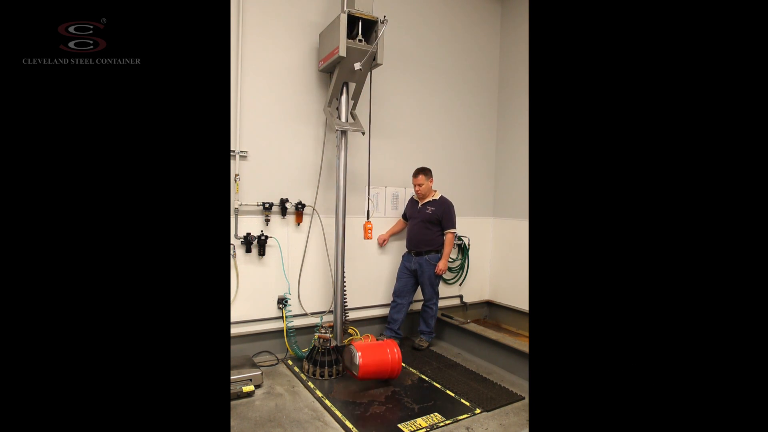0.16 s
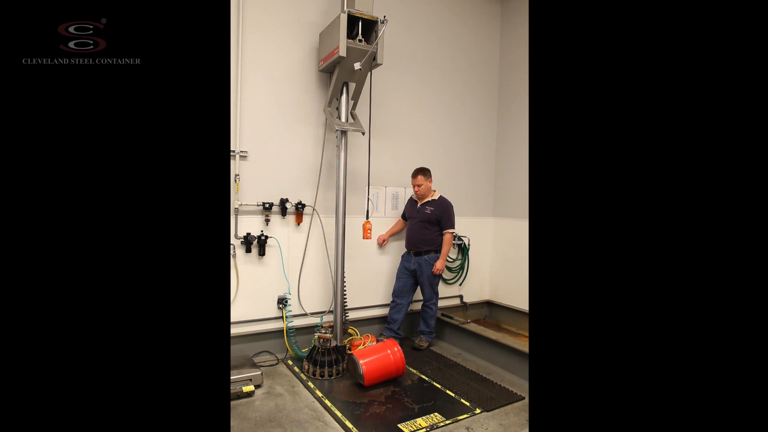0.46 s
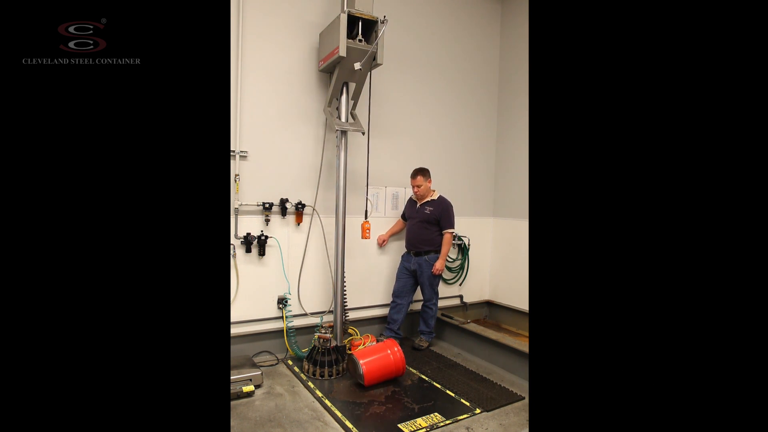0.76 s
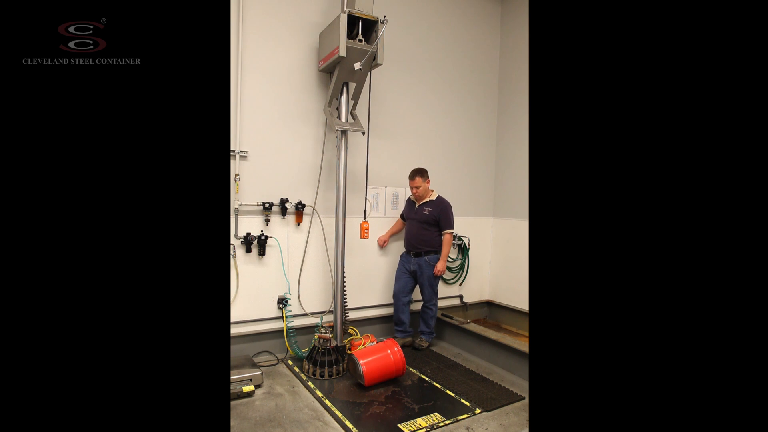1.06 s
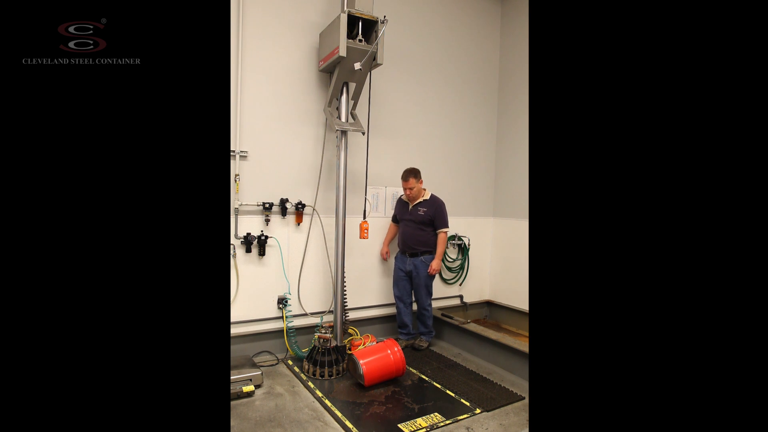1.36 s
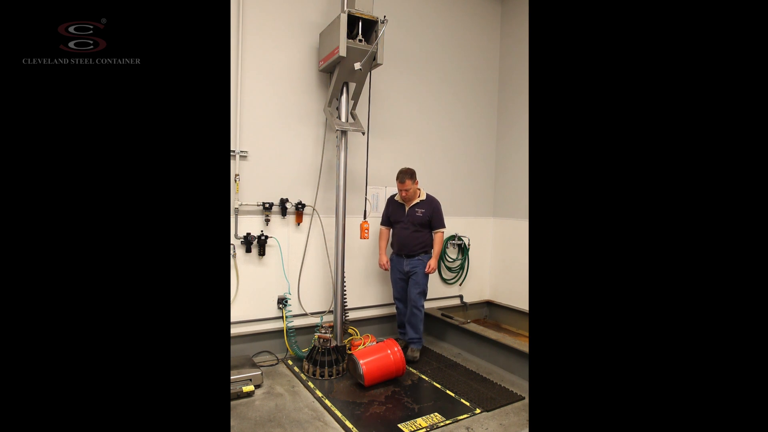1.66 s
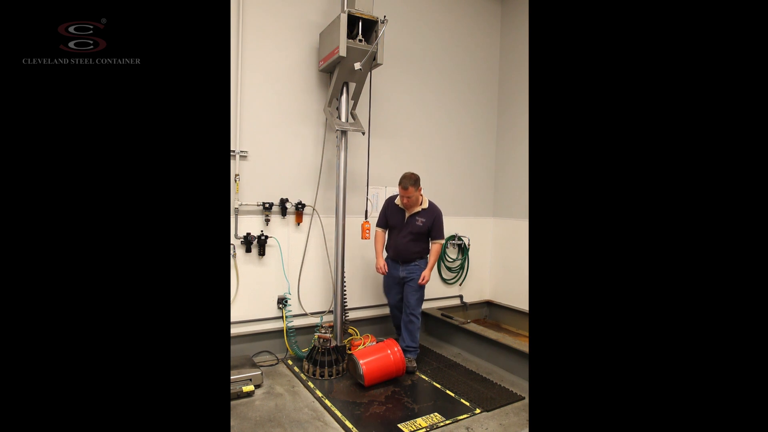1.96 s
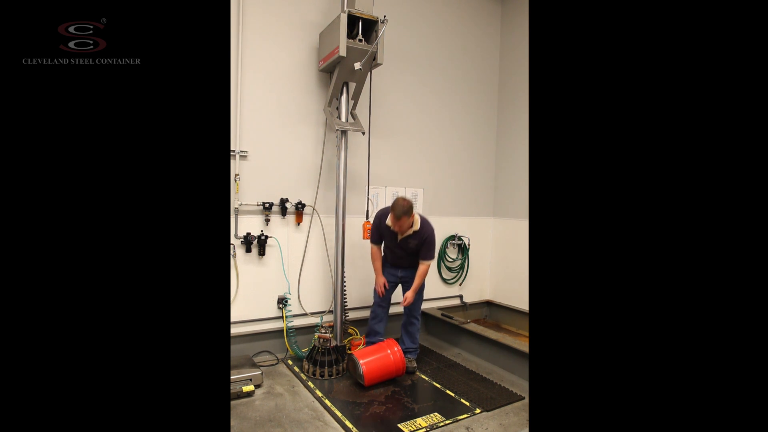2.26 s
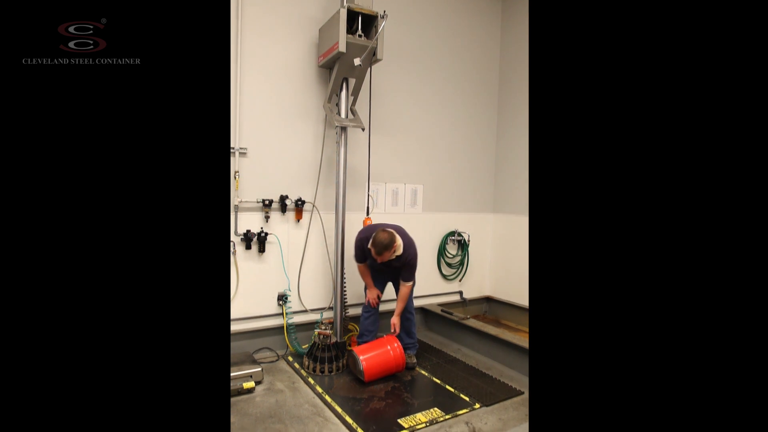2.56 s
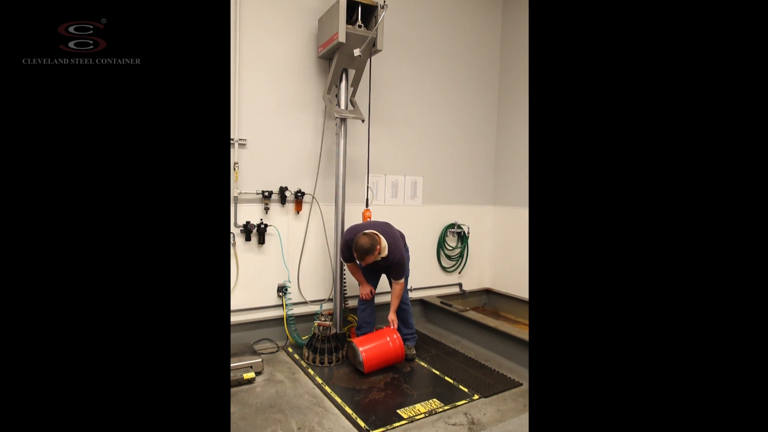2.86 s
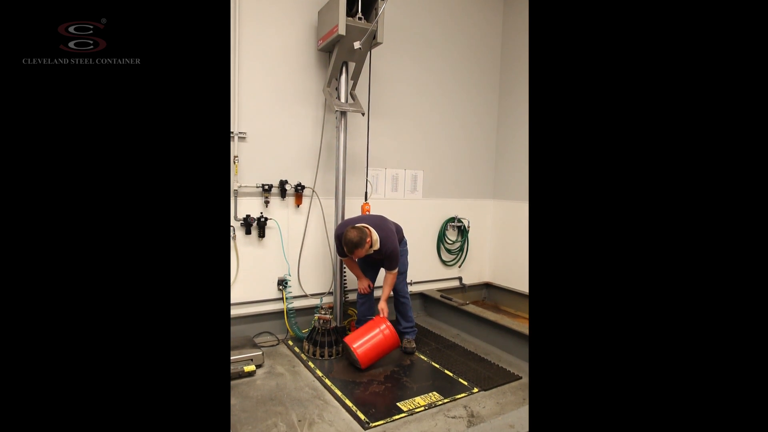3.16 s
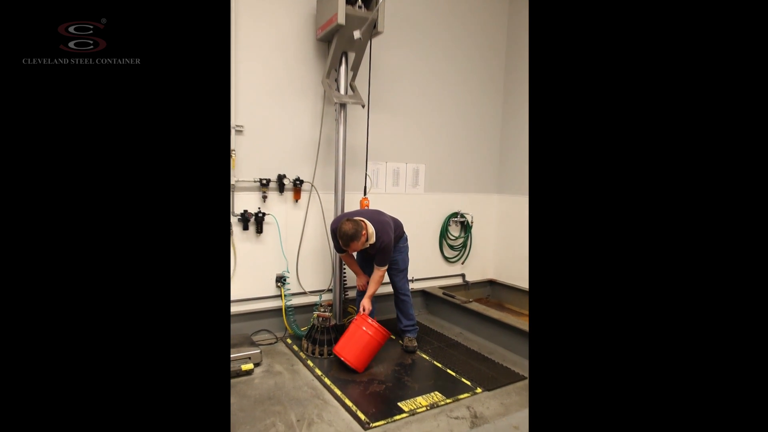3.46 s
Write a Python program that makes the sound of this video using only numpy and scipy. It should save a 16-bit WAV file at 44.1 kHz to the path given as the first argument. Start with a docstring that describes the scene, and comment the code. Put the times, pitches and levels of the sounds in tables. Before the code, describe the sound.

A steel pail slams onto a steel floor plate at 0.15 seconds, just after a drop rig's clatter, with weaker rebounds until 0.5. Boom and bright echo fade through a hard workshop; a thin handle ping follows near 1.04. The level dips over wavering ventilation hum, with ticks and soft swishes from 1.6. From 3.0 the pail scrapes and rumbles, thuds softly, and its handle knocks at 3.4.

```python
"""A clattering drop rig is heard first; its steel pail then slams onto a steel floor plate in a hard-walled workshop.
Modes, filtered noise and a diffuse echo form each rebound; the wire handle pings as decaying sines and noise.
Small ticks and swishes of noise sound over a wavering ventilation hum while the level dips.
The pail is then dragged and tipped up, as random contacts; soft rim thuds excite its modes,
and knocks against its wall ring those of the handle."""
import sys
import numpy as np
from scipy import signal
from scipy.fft import rfft, irfft
from scipy.io import wavfile

SR = 44100
rng = np.random.default_rng(int(sys.argv[2]) if len(sys.argv) > 2 else 0)


def generate_wav(sig):
    """Save sig (samples, or channels by samples) to the path in sys.argv[1] as 16-bit PCM at SR."""
    pcm = np.round(np.clip(np.atleast_2d(sig).T, -1, 1) * 32767).astype(np.int16)
    wavfile.write(sys.argv[1], SR, pcm)


N = 158760

# Source levels are those before the overall level curve and the stereo balance.
# Blows of the pail on the plate. Each row: start in seconds, level of body, boom and echo in dB, crack in dB.
SLAMS = [(0.1476, -18.5, -6), (.226, -28.5, -24), (.349, -39, -22.5), (.408, -45.5, -23),
         (.472, -44, -27.5)]
# Modes of the pail. Each row: frequency in Hz, relative level in dB, decay time t60 in seconds.
PAIL_MODES = [(150, 1, .55), (178, -2, .55), (291, -4, .8), (346, -4, .8), (470, -6, .7), (576, -1, .65),
              (738, -2, .9), (765, -3, .7), (1076, -7, .8), (1150, -6, .7), (1295, -11, .9),
              (2283, -10, .4), (3125, -9, .3), (7208, -10, .45), (7620, -10, .4)]
# Spectrum of the slam's crack. Each row: frequency in Hz, density in dB per Hz.
CRACK_COLOUR = [(100, -22), (500, -4), (1200, 2.5), (2300, -8.5), (4300, -14.5), (6000, -4), (7300, 2),
                (9000, -10), (11000, -20.5), (14500, -24), (17000, -42.5)]
# Spectrum of the slam's echo. Each row: frequency in Hz, density in dB per Hz.
SLAM_COLOUR = [(40, -33), (100, -17), (150, -7), (300, -5), (500, -4.5), (700, -1), (950, -5.5), (1300, -6),
               (1800, -7.5), (2600, -10), (4200, -9.5), (7300, -8), (9000, -15.5), (11000, -25.5),
               (14000, -35), (16500, -49)]
# Spectrum of the pail's boom. Each row: frequency in Hz, density in dB per Hz.
BOOM_COLOUR = [(30, -32), (70, -16), (110, -10.5), (150, -2.5), (200, -2), (240, -7.5), (290, -2),
               (420, -10), (570, -4.5), (900, -19), (2500, -50.5)]
BOOM_DB, BOOM_BUILD_S, BOOM_T60_S = -7.5, 0.095, .48  # level relative to the slam

# Soft thuds of the rim as the pail rocks. Each row: start in seconds, level in dB.
THUDS = [(3.076, -38), (3.558, -34.5)]
THUD_SOFT_HZ, THUD_T60_S = 350, 0.32  # treble roll-off; extra decay on top of the modes' own

# Knocks of the handle on the pail. Each row: start in seconds, echo in dB, crack in dB, ring in dB.
KNOCKS = [(3.3924, -35.5, -28.5, -29), (3.402, -36, -24, -38.5), (3.413, -66, -29, -38.5),
          (3.452, -55, -30.5, -49)]
# Modes of the wire handle. Each row: frequency in Hz, relative level in dB, decay time t60 in seconds.
HANDLE_MODES = [(1294, -10, 1.2), (1614, -9, .8), (1790, -13, .7), (1916, -12, .8), (2214, -12, .8),
                (2344, -13, .7), (3117, 0, .55), (3167, -3, .5), (3270, -2, .08), (3413, -8, .3),
                (5276, -14, .3), (7144, -19, .4)]
# Spectrum of a knock and its echo. Each row: frequency in Hz, density in dB per Hz.
KNOCK_COLOUR = [(100, -41.5), (600, -11), (850, -3.5), (1150, 1.5), (1700, 0), (2500, -4), (3150, 1.5),
                (4200, -5.5), (7000, -10.5), (10000, -20.5), (15000, -45), (17000, -42)]

# Modes of the settling handle. Each row: frequency in Hz, relative level in dB, decay time t60 in seconds.
PING_MODES = [(7260, 0, 1.8), (7270, -8, 1.8), (7310, -7, 1.1), (7480, -9, .6), (7820, -13.5, .3)]
# Spectrum of the ping's shimmer. Each row: frequency in Hz, density in dB per Hz.
PING_SHIMMER_COLOUR = [(1000, -48.5), (6000, -41), (6950, -25), (7130, 10), (7400, 4), (7900, -5.5),
                       (8600, -16), (11000, -46), (16000, -52.5)]
# Spectrum of the ping's click. Each row: frequency in Hz, density in dB per Hz.
PING_CLICK_COLOUR = [(1000, -45), (6600, -28), (7200, -2), (7900, 5.5), (8800, -7), (10500, -20.5),
                     (16000, -42)]
PING_S, PING_DB, SHIMMER_T60_S = 1.04, -59.5, 2.2

# Effort of dragging the pail. Each row: time in seconds, grit level in dB.
DRAG = [(3.02, -38.5), (3.08, -36), (3.12, -61), (3.2, -57), (3.38, -47.5), (3.6, -30)]
# Rumble of the pail rolling on its rim. Each row: time in seconds, level in dB.
ROLL = [(2.98, -74.5), (3.03, -57), (3.08, -43.5), (3.14, -41.5), (3.25, -42.5), (3.38, -42.5), (3.44, -39),
        (3.52, -40.5), (3.6, -42)]
# Spectrum of the scraping grit. Each row: frequency in Hz, density in dB per Hz.
SCRAPE_COLOUR = [(180, -26), (300, 1.5), (519, -13.5), (856, -10), (1100, -12.5), (1360, -10.5),
                 (1510, -15), (2610, -16), (4830, -26.5), (6300, -26.5), (16000, -67.5)]
# Spectrum of the rolling rumble. Each row: frequency in Hz, density in dB per Hz.
RUMBLE_COLOUR = [(30, -29), (70, -17), (120, -5.5), (170, 4.5), (215, -5.5), (290, -5.5), (400, -13),
                 (600, -25), (1500, -59)]
DRAG_START_S = 3.015

# Spectrum of the rig's clatter. Each row: frequency in Hz, density in dB per Hz.
RIG_COLOUR = [(24, -56.5), (40, -23), (124, -19), (171, -0.5), (297, -11), (345, 2), (491, -8),
              (542, -11.5), (770, -8), (918, -14.5), (1270, -9.5), (1480, -14), (6330, -21), (7360, -16.5),
              (16000, -63.5)]
RIG_S, RIG_DB, RIG_CLATTER_S = -.2, -24, 0.27  # starts before time zero; contacts last RIG_CLATTER_S

# Small dry ticks. Each row: start in seconds, level in dB, treble tilt in dB per octave, hollow clack in dB.
TICKS = [(1.5983, -66, -13, -63), (1.627, -44.5, 0.5, -43), (1.631, -66, 1, -56),
         (1.8156, -58.5, -0.5, -64.5), (1.956, -54, 0, -55.5), (2.4978, -54, -4, -60), (2.517, -53, 0, -59),
         (2.5408, -53.5, 0, -59), (2.5642, -62, 5, -62), (2.576, -53.5, -3, -54.5), (2.597, -58, 1.5, -66),
         (2.6259, -49, 4, -60), (2.658, -49, 3.5, -59), (2.766, -47.5, 3, -52.5), (2.962, -39, 2, -49)]
# Spectrum of a tick before its tilt. Each row: frequency in Hz, density in dB per Hz.
TICK_COLOUR = [(50, -31.5), (200, -3), (700, -6.5), (1200, 7.5), (2100, -4), (3300, -1.5), (4300, -6.5),
               (5500, -1), (7000, 0.5), (9000, -14), (12500, -36), (14500, -37.5), (17000, -56)]
# Spectrum of the hollow clack. Each row: frequency in Hz, density in dB per Hz.
CLACK_COLOUR = [(100, -38), (700, -21), (1100, -10), (1700, 1.5), (2400, 3.5), (2900, -13), (3700, -13),
                (5000, -26), (16000, -52)]

# Soft swishes of clothes and shoe soles.
# Each row: centre in seconds, half width in seconds, level in dB, treble tilt in dB per octave.
SWISHES = [(1.645, 0.0224, -62.5, -7), (1.89, 0.062, -73.5, -4), (1.98, 0.036, -69.5, -7.5),
           (2.14, 0.0436, -72, 0), (2.32, 0.039, -73, 4), (2.49, 0.13, -69.5, -5), (2.59, 0.14, -65.5, -10),
           (2.8, 0.082, -69.5, -9)]
# Spectrum of a swish before its tilt. Each row: frequency in Hz, density in dB per Hz.
SWISH_COLOUR = [(100, -39), (700, -5.5), (1300, -5), (2500, -2.5), (4500, -5), (7000, 3), (10000, -11.5),
                (13000, -21.5), (17000, -33.5)]

# Ventilation hum. Each row: frequency in Hz, level before the swell in dB.
HUM = [(167, -52), (196, -65.5), (288, -63.5), (420, -66), (845, -76.5), (1270, -72.5), (2190, -79),
       (2310, -78.5)]
# Swelling and sinking of the hum. Each row: time in seconds, gain in dB.
HUM_SWELL = [(.75, -2.5), (.95, 6), (1.15, 3.5), (1.5, -1), (2.0, -3), (2.5, 0), (3.0, -1.5)]
# Spectrum of the rush of air. Each row: frequency in Hz, density in dB per Hz.
AIR_COLOUR = [(18, -61.5), (30, -31.5), (118, -11), (161, -5.5), (210, -12.5), (287, -10.5), (384, -18.5),
              (426, -12.5), (540, -29), (584, -19.5), (684, -32), (822, -27), (1350, -27), (2170, -27.5),
              (4300, -40.5), (6550, -39), (16000, -67.5)]
AIR_DB = -54

# Reverberation of the workshop. Each row: frequency in Hz, decay time t60 in seconds.
ROOM_T60 = [(60, 0.97), (150, 1.2), (300, 1.25), (700, 1.78), (1500, 1.55), (4000, 1.466), (7500, 1.214),
            (10000, 0.89), (16000, 1.1)]
BUILD_S, BASS_BUILD_S = 0.0014, 0.11  # build-up time constant; amount added in the bass

# Level of all but the ticks and swishes: it dips and slowly recovers. Each row: time in seconds, gain in dB.
LEVEL_DIP = [(1.135, -6.5), (1.21, -19.5), (1.33, -18.5), (1.55, -11.5), (1.8, -10), (2.2, -8),
             (2.55, -7.5), (2.95, -5.5), (3.05, 5)]
LEFT_DB = 7.65  # left relative to right
CEILING, TOP_HZ = .85, 16500  # largest amplitude entering the filter; its cutoff


def amp(db):
    """A level in decibels is twenty times the logarithm of the amplitude ratio."""
    return 10 ** (np.asarray(db) / 20)


def clock():
    """Sampled time is the sample index over the rate, in seconds."""
    return np.arange(N) / SR


def unit(x, span_s=None):
    """Normalisation to rms 1, over the opening span if one is given."""
    end = N if span_s is None else int(span_s * SR)
    return x / np.sqrt(np.mean(x[:end] ** 2))


def at_hz(points, hz):
    """Linear interpolation of a table on a logarithmic frequency axis."""
    f, v = np.array(points, float).T
    return np.interp(np.log(np.maximum(hz, 1)), np.log(f), v)


def gain_curve(points):
    """Time-varying gain, interpolated in decibels."""
    times, levels = np.array(points, float).T
    return amp(np.interp(clock(), times, levels))


def conv(x, h):
    """Linear convolution, cut to the scene's length."""
    return signal.fftconvolve(x, h)[:N]


def colour(x, points, tilt_db=0, size=4096):
    """Minimum-phase filtering to a spectrum, with a tilt per octave above 1 kHz."""
    f = np.maximum(np.fft.rfftfreq(size, 1 / SR), 1)
    octaves = np.log2(np.maximum(f / 1000, 1))
    cepstrum = irfft(np.log(amp(at_hz(points, f) + tilt_db * octaves)))
    # folding the cepstrum onto positive times makes the filter causal
    cepstrum[1:size // 2] *= 2
    cepstrum[size // 2 + 1:] = 0
    return conv(x, irfft(np.exp(rfft(cepstrum))))


def add(out, x, start_s):
    """Superposition of a sound at its start; any part before time zero is lost."""
    i = int(start_s * SR)
    x, i = x[max(-i, 0):], max(i, 0)
    out[i:i + len(x)] += x[:N - i]


def fade(t60):
    """Exponential decay, falling 60 dB in t60 seconds."""
    return np.exp(-np.log(1000) * clock() / max(abs(t60), 1e-3))


def walk(rate_hz):
    """Low-pass Gaussian noise: a smooth random wander of rms 1."""
    f = np.fft.rfftfreq(N, 1 / SR)
    spectrum = rfft(rng.standard_normal(N)) * np.exp(-(f / rate_hz) ** 2)
    return unit(irfft(spectrum, N))


def ring(modes, flutter):
    """Modal synthesis: decaying sines whose strength flutters as echoes overlap."""
    t, out = clock(), np.zeros(N)
    for hz, db, t60 in modes:
        strength = amp(db) * fade(t60) * (1 + flutter * walk(22))
        out += strength * np.sin(2 * np.pi * (hz * t + rng.random()))
    return out


def room():
    """Diffuse reverberation: noise bands build up and decay, the bass building up more slowly."""
    f, noise = np.fft.rfftfreq(N, 1 / SR), rfft(rng.standard_normal(N))
    out = np.zeros(N)
    centres = np.geomspace(50, 16000, 14)
    # each row of the identity matrix picks out one overlapping band
    for hz, pick in zip(centres, np.eye(len(centres))):
        band = irfft(noise * at_hz(np.c_[centres, pick], f), N)
        build_s = BUILD_S + BASS_BUILD_S / (1 + (hz / 450) ** 2)
        out += band * fade(at_hz(ROOM_T60, hz)) * (1 - np.exp(-clock() / build_s))
    return out


def chatter(rate, spread_db):
    """Random impulses at a mean rate per second, of random sign and log-normal size."""
    happens = rng.random(N) < rate / SR
    sign = rng.choice([-1, 1], N)
    return happens * sign * amp(spread_db * rng.standard_normal(N))


def crack(t60, shiver_db, shiver_t60):
    """Two-stage noise decay: a hard contact, then the brief shiver of dense sheet-metal modes."""
    return rng.standard_normal(N) * (fade(t60) + amp(shiver_db) * fade(shiver_t60))


def slams():
    """Impact excitation: each blow cracks, rings the pail, makes it boom and fills the room."""
    out, t = np.zeros(N), clock()
    for s, db, crack_db in SLAMS:
        contact = crack(t60=0.0085, shiver_db=-2.5, shiver_t60=0.17)
        hit = unit(colour(contact, CRACK_COLOUR), .003)
        body = unit(ring(PAIL_MODES, flutter=0.45) * (1 - np.exp(-t / .02)), .1)
        boom_envelope = fade(BOOM_T60_S) * (1 - np.exp(-t / BOOM_BUILD_S)) ** 2
        boom = unit(colour(rng.standard_normal(N), BOOM_COLOUR) * boom_envelope, .15)
        echo = unit(colour(room(), SLAM_COLOUR), 0.13)
        resonance = amp(-8) * body + amp(BOOM_DB) * boom + amp(-1.5) * echo
        add(out, amp(crack_db) * hit + amp(db) * resonance, s)
    return out


def thuds():
    """Soft impact: the rim's slow contact on the plate mainly excites the pail's low modes."""
    out = np.zeros(N)
    low_modes = []
    for hz, db, t60 in PAIL_MODES:
        loss_db = 20 * np.log10(1 + (hz / THUD_SOFT_HZ) ** 4)
        low_modes.append((hz, db - loss_db, t60))
    envelope = fade(THUD_T60_S) * (1 - fade(0.034))  # decay times gradual onset
    for s, db in THUDS:
        add(out, amp(db) * unit(ring(low_modes, flutter=0.374) * envelope, 0.02), s)
    return out


def knocks():
    """Repeated impact: the wire handle strikes the pail and bounces, each contact ringing the handle anew."""
    out = np.zeros(N)
    for s, db, crack_db, ring_db in KNOCKS:
        contact = crack(t60=.05, shiver_db=-27, shiver_t60=0.165)
        hit = unit(colour(contact, KNOCK_COLOUR), 0.004)
        echo = unit(colour(room(), KNOCK_COLOUR), 0.0514)
        wire = unit(ring(HANDLE_MODES, flutter=0.091), 0.00747)
        add(out, amp(crack_db) * hit + amp(db) * echo + amp(ring_db) * wire, s)
    return out


def ping():
    """Free vibration: the settling handle clicks and rings thinly, blurred by a long noise shimmer."""
    out = np.zeros(N)
    click = unit(colour(rng.standard_normal(N), PING_CLICK_COLOUR) * fade(0.27), .03)
    wire = unit(ring(PING_MODES, flutter=0.88), 0.096)
    shimmer = unit(colour(rng.standard_normal(N), PING_SHIMMER_COLOUR) * fade(SHIMMER_T60_S), 0.102)
    shimmer = shimmer * amp(1.97 * walk(9.2))  # random level flutter
    mix = amp(-1.5) * click + amp(-3) * wire + amp(0.5) * shimmer
    add(out, amp(PING_DB) * mix, PING_S)
    return out


def drag():
    """Friction as dense random contacts: the rim scrapes on the plate while the pail's drum rumbles."""
    grit = unit(colour(chatter(2500, 1.3), SCRAPE_COLOUR))
    grit = grit * gain_curve(DRAG) * (clock() > DRAG_START_S)
    echo = room()
    scrape = amp(-8) * grit + conv(grit, echo / np.linalg.norm(echo))
    rumble = unit(colour(chatter(900, 0.8), RUMBLE_COLOUR)) * gain_curve(ROLL)
    return scrape + rumble


def rig():
    """Reverberated random impacts: the released arms of the drop rig clatter into the room."""
    out = np.zeros(N)
    contacts = chatter(300, 2) * (clock() < RIG_CLATTER_S) * fade(1.9)
    clatter = unit(colour(conv(contacts, room()), RIG_COLOUR), 0.27)
    add(out, amp(RIG_DB) * clatter, RIG_S)
    return out


def ticks():
    """Short noise bursts: dry ticks with hollow clacks, as someone steps up and reaches for the pail."""
    out = np.zeros(N)
    for s, db, tilt_db, clack_db in TICKS:
        contact = crack(t60=0.0087, shiver_db=-31.5, shiver_t60=0.099)
        snap = unit(colour(contact, TICK_COLOUR, tilt_db), 0.0019)
        clack = unit(colour(rng.standard_normal(N) * fade(0.022), CLACK_COLOUR), 0.0028)
        add(out, amp(db) * snap + amp(clack_db) * clack, s)
    return out


def swishes():
    """Rubbing as random contacts under a Gaussian envelope: cloth and soles as someone bends down."""
    out = np.zeros(N)
    for s, width_s, db, tilt_db in SWISHES:
        rub = unit(colour(chatter(3000, 4.35), SWISH_COLOUR, tilt_db))
        out += amp(db) * rub * np.exp(-((clock() - s) / width_s) ** 2)
    return out


def ventilation():
    """Narrow-band noise: randomly modulated quadrature tones waver over a soft rush of air."""
    turn = 2 * np.pi * clock()
    hum = np.zeros(N)
    for hz, db in HUM:
        hum += amp(db) * (walk(11.6) * np.sin(hz * turn) + walk(11) * np.cos(hz * turn))
    air = amp(AIR_DB) * unit(colour(rng.standard_normal(N), AIR_COLOUR)) * amp(0.6 * walk(8.1))
    return hum * gain_curve(HUM_SWELL) + air


def scene():
    """Superposition at one point, louder on the left; the ticks and swishes escape the level dip."""
    dipped = slams() + thuds() + knocks() + ping() + drag() + rig() + ventilation()
    mono = dipped * gain_curve(LEVEL_DIP) + ticks() + swishes()
    sides = np.array([[amp(LEFT_DB)], [1]])
    return mono * sides / sides.mean()


def record(dry):
    """Saturation rounds the highest peaks, then an elliptic low-pass filter cuts the top."""
    rounded = CEILING * np.tanh(dry / CEILING)
    low_pass = signal.ellip(8, .2, 70, TOP_HZ, fs=SR, output="sos")
    return signal.sosfilt(low_pass, rounded)


dry = scene()
out = record(dry)
generate_wav(out)
```